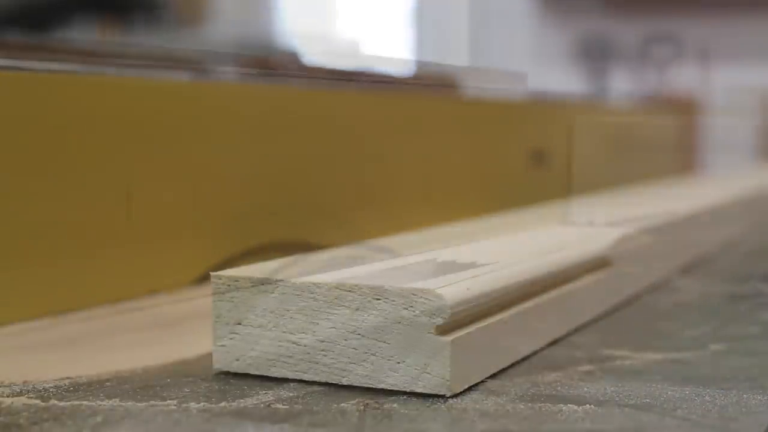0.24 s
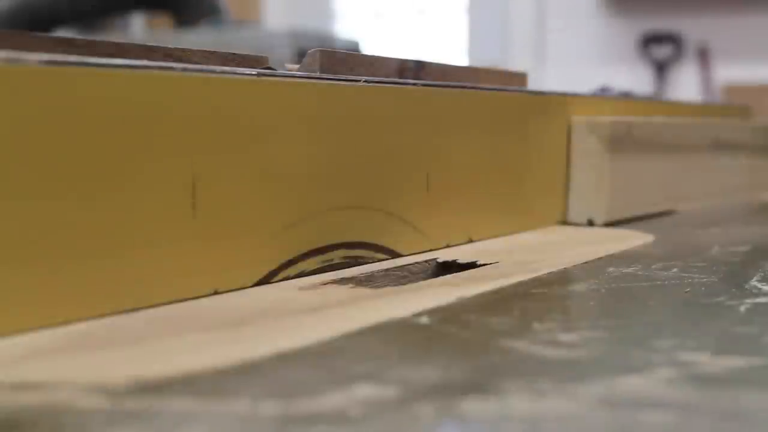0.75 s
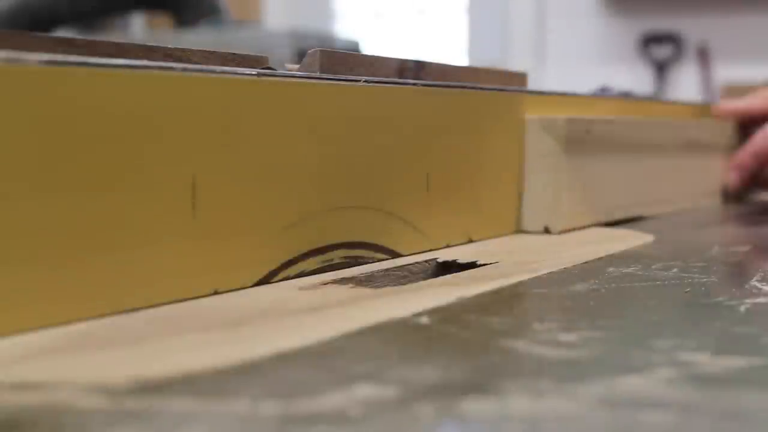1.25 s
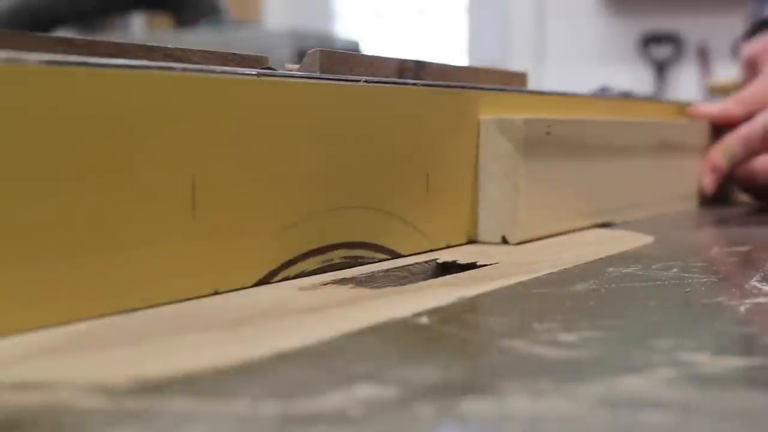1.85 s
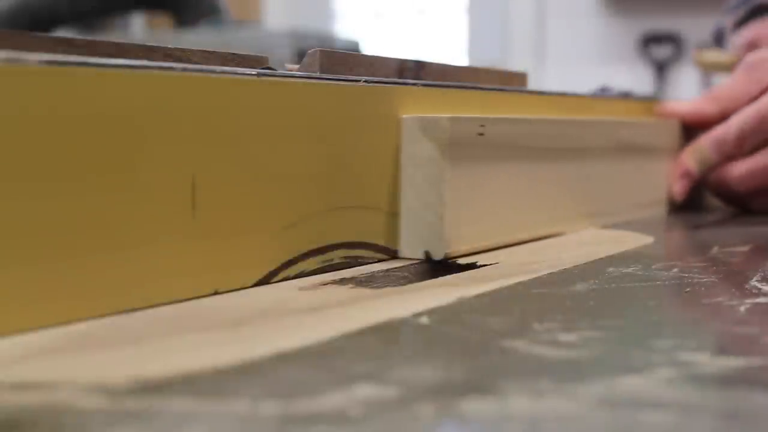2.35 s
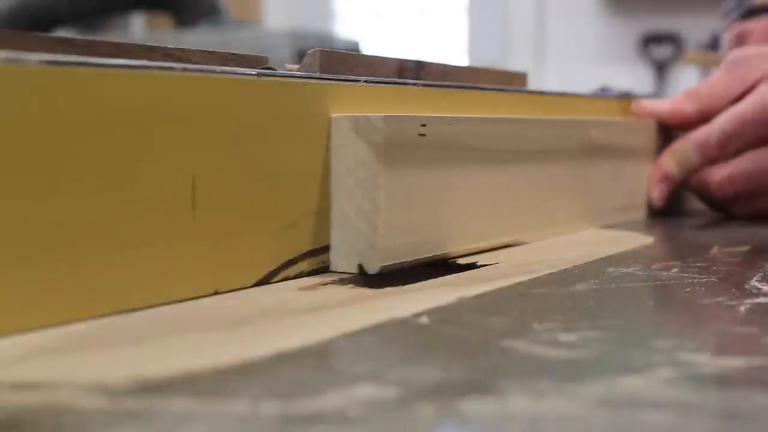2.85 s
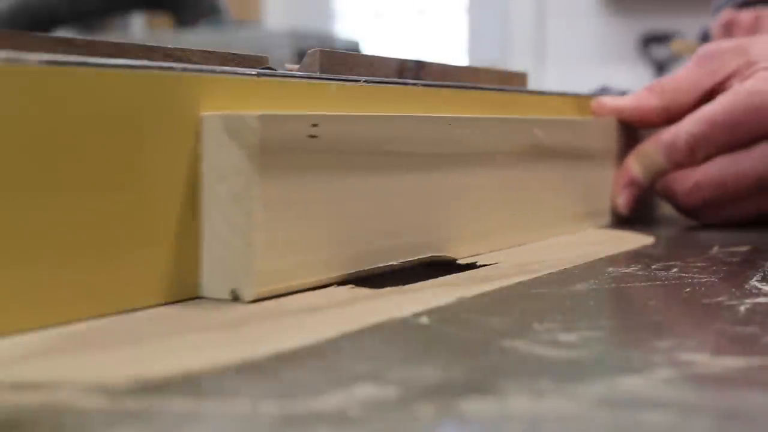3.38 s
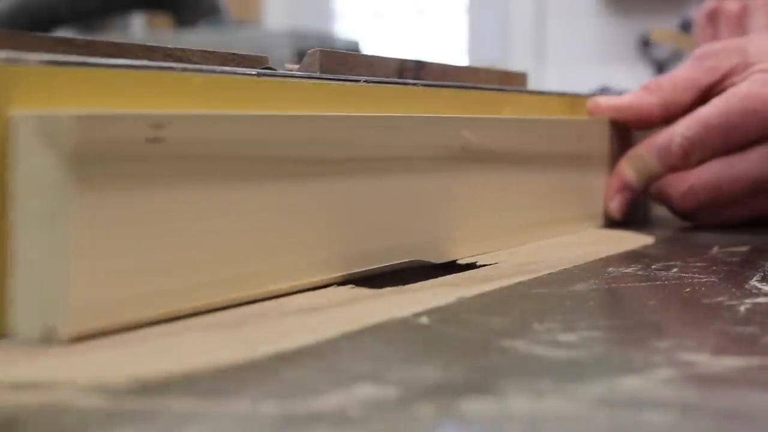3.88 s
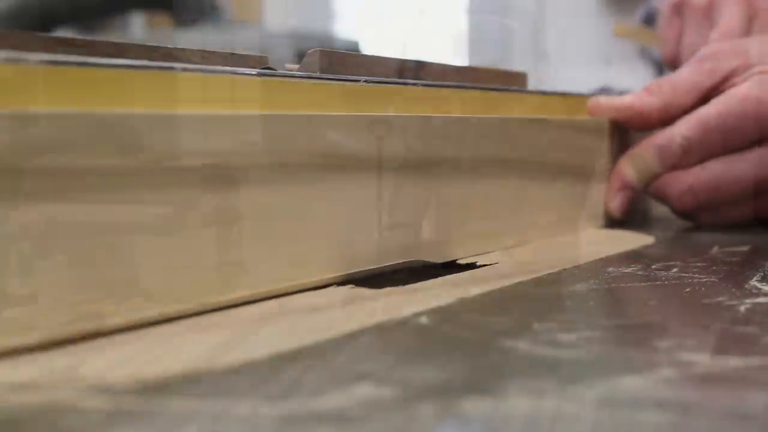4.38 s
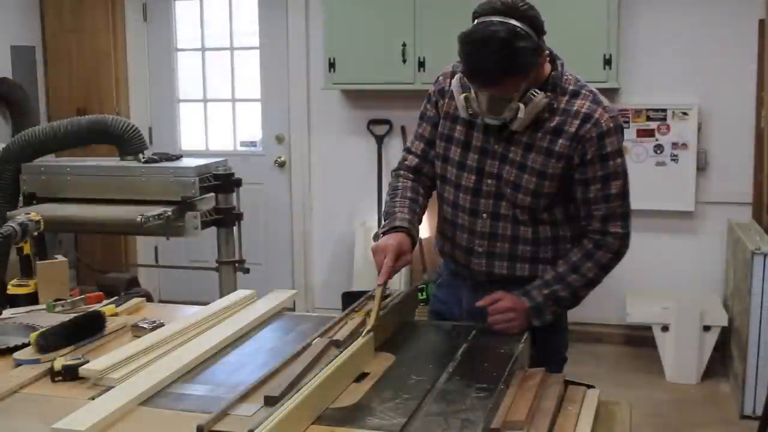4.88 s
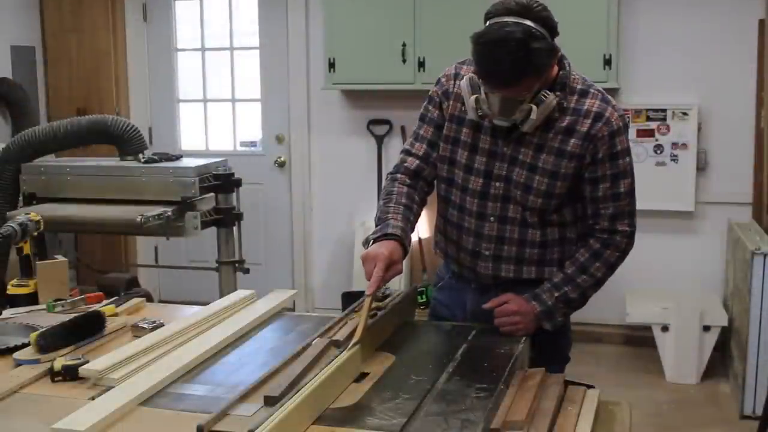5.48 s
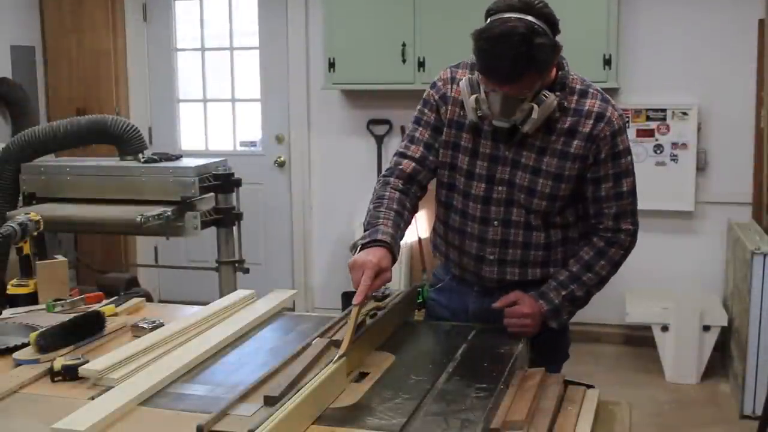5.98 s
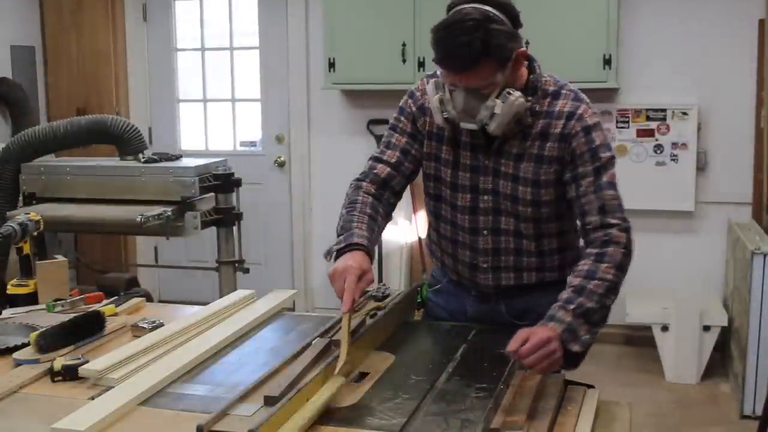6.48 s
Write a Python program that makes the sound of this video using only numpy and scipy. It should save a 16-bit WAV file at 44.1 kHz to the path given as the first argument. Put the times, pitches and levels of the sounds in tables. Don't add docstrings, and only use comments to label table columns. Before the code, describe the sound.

A table saw clacks and spins up to a harsh overloaded close drone, bites into a board, then dissolves to a more distant whine ending in a knock.

```python
import sys
import numpy as np
from scipy import signal
from scipy.fft import rfft, irfft, next_fast_len
from scipy.io import wavfile

SR = 44100
rng = np.random.default_rng(int(sys.argv[2]) if len(sys.argv) > 2 else 0)


def generate_wav(signal):
    frames = np.transpose(np.atleast_2d(signal))
    scaled = np.clip(frames, -1, 1) * 32767
    pcm = np.round(scaled).astype(np.int16)
    wavfile.write(sys.argv[1], SR, pcm)


def voltage_ratio(level):
    return 10 ** (np.asarray(level, float) / 20)


N = 296793
TIME = np.arange(N) / SR
RUN_HZ = 216.2


def evened(x):
    return x / np.sqrt(np.mean(x ** 2) + 1e-20)


def ramp(start_s, end_s):
    return np.clip((TIME - start_s) / (end_s - start_s), 0, 1)


def columns(rows):
    time_s, *values = np.transpose(rows)
    return [np.interp(TIME, time_s, value) for value in values]


def noise(colour):
    size = next_fast_len(N)
    freq_hz, level_db = np.transpose(colour)
    bins_hz = np.fft.rfftfreq(size, 1 / SR)
    gain = voltage_ratio(np.interp(np.log(bins_hz + 1), np.log(freq_hz), level_db))
    return evened(irfft(rfft(rng.standard_normal(size)) * gain, size)[:N])


def wander(rate_hz):
    size = next_fast_len(N)
    slow = np.exp(-(np.fft.rfftfreq(size, 1 / SR) / rate_hz) ** 2)
    return evened(irfft(rfft(rng.standard_normal(size)) * slow, size)[:N])


def ring(x, freq_hz, width_hz):
    radius = np.exp(-np.pi * width_hz / SR)
    turn = radius * np.cos(2 * np.pi * freq_hz / SR)
    return 2 * (1 - radius) * signal.lfilter([1, -turn], [1, -2 * turn, radius ** 2], x)


def struck(start_s, level_db, t60_s):
    after_s = TIME - start_s
    attack = np.clip(after_s / .001, 0, 1)
    return voltage_ratio(level_db - 60 * np.maximum(after_s, 0) / t60_s) * attack


def overload(x, sag=0, knee=0.014):
    ceiling, floor = .297, -.284
    top = ceiling - sag - knee * np.logaddexp(0, (ceiling - sag - x) / knee)
    return floor + knee * np.logaddexp(0, (top - floor) / knee)


# freq_hz, level_db (per Hz)
ROOM_COLOUR = [(18, -47), (30, -15), (86, -9), (124, 0), (157, -6), (328, -11), (473, -11), (721, -13),
               (1070, -13), (3670, -18.5), (16000, -42)]
# freq_hz, level_db
HUM = [(120, -67), (480, -74)]


def workshop():
    rustle_s, rustle_half_s, rustle_db = 0.14, 0.075, 4
    rustle = rustle_db * np.exp(-((TIME - rustle_s) / rustle_half_s) ** 4)
    level_db = -62.5 - 11 * TIME + rustle - 60 * ramp(.55, 0.59)
    hum = 0
    for freq_hz, hum_db in HUM:
        hum = hum + voltage_ratio(hum_db + 2.5 * wander(10)) * np.sin(2 * np.pi * freq_hz * TIME)
    return voltage_ratio(level_db) * noise(ROOM_COLOUR) + hum * (1 - ramp(.36, .55))


# time_s, level_db
SHUDDER = [(.555, -70), (.57, -51), (.582, -49), (.587, -25.5), (.62, -29.5), (.64, -20), (.7, -18),
           (.74, -24.5), (.78, -14)]
# freq_hz, level_db (per Hz)
SHUDDER_COLOUR = [(24, -57), (40, -40), (140, 9.5), (199, -2), (269, 1), (542, -5.5), (1180, -11),
                  (1480, -17.5), (3740, -24.5), (16000, -55)]
# start_s, peak_db, ring_hz, t60_s
CLACKS = [
    (0.5117, -42, 3500, 0.01),
    (0.5856, -32, 2525, 0.016),
    (0.6235, -2, 3760, 0.011),
    (0.6394, -13, 3590, 0.015),
    (0.6497, -1, 2860, 0.016),
    (0.667, -8.5, 3290, 0.034),
    (0.6734, -24, 3030, 0.02),
    (0.686, -18, 3150, 0.02),
    (0.7118, -16, 3180, 0.027),
]


def start_up():
    level_db = np.interp(TIME, *np.transpose(SHUDDER), left=-120, right=-120)
    out = voltage_ratio(level_db) * noise(SHUDDER_COLOUR)
    grit = rng.standard_normal(N)
    for start_s, peak_db, ring_hz, t60_s in CLACKS:
        clack = 0.36 * grit + 5 * ring(grit, ring_hz, 560)
        out += struck(start_s, peak_db - 6.0, t60_s) * clack
    return out


def knife_speed(load):
    full_speed_s, spin_up_hz_per_s, crawl_hz = .806, 1280, 74.2
    overshoot_hz, settle_s, sag_hz = 4, 0.0385, .3
    rising = RUN_HZ + overshoot_hz - spin_up_hz_per_s * (full_speed_s - TIME)
    rising = np.maximum(rising, crawl_hz)
    overshoot = overshoot_hz * np.exp(-((TIME - full_speed_s) / settle_s) ** 2)
    settled = RUN_HZ + overshoot - sag_hz * load
    return np.minimum(rising, settled + 1e3 * (TIME < full_speed_s))


def knife_passes(speed_hz, ahead):
    passes = np.cumsum(speed_hz) / SR
    return passes + ahead - passes[round(4.7 * SR)] % 3


# time_s, edge (0-1 as the slot narrows), bias (pressure)
COVER = [
    (.8, 0.48, -.04),
    (1.2, 0.41, 0.059),
    (2, 0.6, 0.026),
    (2.3, 0.92, -0.074),
    (2.5, 0.56, -.1),
    (3, 0.65, -0.16),
    (3.3, 0.38, -0.057),
    (3.7, 0.49, -0.035),
    (4.6, 0.47, 0.045),
]


def close_tone(speed_hz, passes, deep, edge, bias):
    level_db = -5 + 10.5 * np.log2(speed_hz / RUN_HZ) + 4 * deep
    turn = 2 * np.pi * passes
    steep = -np.cos(3 * turn) / 3 + np.cos(5 * turn) / 5
    uneven = 0.037 * np.cos(2 / 3 * turn) + 0.021 * np.cos(4 / 3 * turn + 0.23)
    lean = -0.16 * np.sin(2 * turn)
    tone = np.cos(turn) + edge * steep + lean + bias + uneven
    return np.sqrt(2) * voltage_ratio(level_db) * tone


# freq_hz, level_db
CLOSE_AIR = [(30, -17.5), (130, 12.5), (320, 2.5), (800, 1), (2000, -8.5), (4000, -23.5), (8000, -20),
             (16000, -45)]


def close_rush(speed_hz, deep):
    level_db = -19 + 11 * np.log2(speed_hz / RUN_HZ) + 4 * deep
    return voltage_ratio(level_db + 0.5 * wander(33)) * noise(CLOSE_AIR)


def slot_flutter(passes, edge):
    hiss = evened(ring(rng.standard_normal(N), 2780, 860))
    return 0.087 * edge ** 2 * hiss * (1 - np.cos(2 * np.pi * passes))


KNIVES_DB = [0, -15, -18]


def knife_sizes(passes, spread_db):
    count = passes.astype(int)
    chance = np.clip(rng.standard_normal(4000), -2, 2)
    return voltage_ratio(np.take(KNIVES_DB, count % 3) + spread_db * chance[count])


def bursts(passes, colour, length, spread_db):
    shape = np.exp(-((passes % 1 - .5) / length) ** 2)
    return evened(knife_sizes(passes, spread_db) * shape) * noise(colour)


def wood(passes, modes, scraping):
    struck_now = np.diff(np.floor(passes), prepend=np.floor(passes[0]))
    blows = struck_now * knife_sizes(passes, spread_db=1.5)
    drive = evened(blows) + scraping * rng.standard_normal(N)
    out = 0
    for freq_hz, width_hz, level_db in modes:
        mode = ring(ring(drive, freq_hz, width_hz), freq_hz, width_hz)
        out = out + voltage_ratio(level_db) * evened(mode)
    return evened(out)


# start_s, shock_db, shock_fade_s, steady_db
CONTACTS = [
    (2.56, -37, .2, -49),
    (3.66, -31, 0.051, -29),
    (4.46, -22, 0.37, -32),
]


def bite_size(deep):
    size = voltage_ratio(-43.5) * np.ones(N)
    for start_s, shock_db, fade_s, steady_db in CONTACTS:
        shock = voltage_ratio(shock_db) * np.exp(-abs(TIME - start_s) / fade_s)
        size += ramp(start_s, start_s + 0.024) * (shock + voltage_ratio(steady_db))
    return size * voltage_ratio(3 * deep + 1.2 * wander(25))


# freq_hz, level_db
BITE = [(300, -22), (1500, -24.5), (3500, 5.5), (6000, -10), (9000, -2), (11000, -4), (13000, -3),
        (16000, -4)]
# freq_hz, width_hz, level_db
EDGE_RING = [(3500, 600, 0), (1100, 400, -11), (600, 200, -15)]
# freq_hz, width_hz, level_db
THUD = [(584, 170, 0.31), (830, 105, -3.4), (1180, 420, -0.21)]


def close_bites(passes, deep):
    splinters = bursts(passes + .27, BITE, length=.15, spread_db=2)
    slip = .022 * wander(120)
    edge_ring = wood(passes - .13 + slip, EDGE_RING, scraping=.12)
    thud = voltage_ratio(-16.5) * deep * wood(passes - .13, THUD, scraping=.1)
    return bite_size(deep) * (.6 * splinters + 1.5 * edge_ring) + thud


def close_view():
    speed_hz = knife_speed(ramp(3.66, 3.75))
    deep = ramp(3.95, 4.57)
    edge, bias = columns(COVER)
    passes = knife_passes(speed_hz, ahead=3)
    saw = close_tone(speed_hz, passes, deep, edge, bias) + close_rush(speed_hz, deep)
    saw = saw + slot_flutter(passes, edge) + close_bites(passes, deep)
    pressure = ramp(.66, .739) * saw + start_up() + workshop()
    letting_go = np.clip(passes % 1 - .13, 0, .2) * (passes % 1 < .5)
    return overload(pressure, sag=.75 * letting_go * ramp(.73, .78))


def run_out():
    leave_s, release_s, short_s = 5.78, .08, 0.33
    cutting = 1 - ramp(leave_s - release_s / 2, leave_s + release_s / 2)
    short = np.exp(-np.maximum(leave_s - release_s - TIME, 0) / short_s)
    return cutting, short, np.maximum(TIME - leave_s, 0)


def orders(table, turn, lag):
    multiple, level_db = np.transpose(table)
    twin = np.sign(np.cos(np.pi * .145 * multiple))
    scatter = .12 * rng.standard_normal(len(multiple))
    phase = (multiple - 1) * (np.pi - lag + scatter)
    out = 0
    for k, sign, db, shift in zip(multiple, twin, level_db, phase):
        out = out + sign * voltage_ratio(db + 0.91 * wander(9.2)) * np.cos(k * turn + shift)
    return out


# multiple, level_db
LOADED = [(1, 3), (2, -3.5), (3, -13), (4, -5.5), (5, -16), (6, -10), (7, -61), (8, -14), (9, -19),
          (10, -15), (11, -22), (12, -17)]
# multiple, level_db
FREE = [(1, 2.5), (2, -7), (3, -10), (4, -12), (5, -22), (6, -13), (7, -11), (8, -21), (9, -21.5),
        (10, -18), (11, -32.5), (12, -48), (13, -25.5), (14, -26.5), (15, -21.5), (16, -55), (17, -43),
        (18, -44), (19, -34), (20, -46), (21, -58), (22, -55), (23, -56), (24, -51)]


def far_tone(passes, cutting, short, since_s):
    free_load, cut_load, end_load = 0.066, 0.63, 1
    load = free_load + cutting * (cut_load + (end_load - cut_load) * short - free_load)
    load = np.clip(load, 0, 1)
    level_db = -23 + 3.5 * short + 1.5 * since_s
    turn = 2 * np.pi * passes
    tone = load * orders(LOADED, turn, lag=.33) + (1 - load) * orders(FREE, turn, lag=.12)
    unbalance = (0.11 + 0.094 * load) * voltage_ratio(wander(3.6)) * np.cos(2 / 3 * turn)
    return np.sqrt(2) * voltage_ratio(level_db) * (tone + unbalance)


# freq_hz, width_hz, level_db
BOARD = [(572, 26, -1), (756, 170, -5), (931, 69, 2), (1135, 150, 3), (1367, 134, 0.5), (1940, 2300, 1),
         (2920, 780, 4.5), (3700, 200, 3), (5900, 4300, -9), (7550, 4600, -8)]
# freq_hz, width_hz, level_db
FREE_END = [(1220, 560, -0.5), (2340, 420, -6), (3495, 270, -4), (4010, 530, -7), (4900, 2100, -8.5)]


def far_board(passes, short, since_s):
    board_db = -29 + 5.5 * short - 60 * since_s / 0.29
    end_db = -35 + 14 * short - 60 * since_s / .28
    board = voltage_ratio(board_db) * wood(passes - .2, BOARD, scraping=.25)
    return board + voltage_ratio(end_db) * wood(passes - .2, FREE_END, scraping=.3)


# freq_hz, level_db
CHIPS = [(1000, -20), (3800, 7), (6000, -5), (9000, -15.5), (11000, -12), (13000, -3.5), (16000, -14)]


def flying_chips(passes):
    outside_s = np.maximum(4.95 - TIME, 0) + np.maximum(TIME - 6, 0)
    level_db = np.maximum(-39 - 84 * outside_s, -60)
    return voltage_ratio(level_db) * bursts(passes + .15, CHIPS, length=.12, spread_db=3.5)


# freq_hz, level_db (per Hz)
FAR_AIR = [(20, -36), (60, -11), (140, 1.5), (240, -8.5), (330, 5.5), (430, -0.5), (520, -4), (1000, -2),
           (2000, -10.5), (3500, -12), (5000, -21.5), (8000, -29.5), (16000, -37.5)]


def blower_air():
    return voltage_ratio(-29.5 + wander(20)) * noise(FAR_AIR)


# start_s, level_db (before the overload), t60_s
KNOCK = [
    (6.701, -4, 0.095),
    (6.718, -22, 0.044),
]
# freq_hz, level_db (per Hz)
KNOCK_COLOUR = [(59, -60), (100, -13), (244, -0.5), (768, -13), (2800, -12), (3320, -12.5), (3860, -21),
                (16000, -75.5)]


def final_knock():
    return sum(struck(*row) for row in KNOCK) * noise(KNOCK_COLOUR)


def far_view():
    cutting, short, since_s = run_out()
    passes = knife_passes(knife_speed(cutting), ahead=3.3)
    saw = far_tone(passes, cutting, short, since_s) + far_board(passes, short, since_s)
    return overload(saw + flying_chips(passes) + blower_air() + final_knock())


def scene():
    far = ramp(4.46, 4.83)
    return ((1 - far) * close_view() + far * far_view())[None]


def band_limit(x):
    return signal.sosfilt(signal.butter(12, 16500, fs=SR, output="sos"), x)


def record(dry):
    low_pass = signal.firwin(511, 15850, window=("kaiser", 9), fs=SR)
    limited = signal.oaconvolve(dry, low_pass[None], "same")
    return band_limit(limited)


dry = scene()
out = record(dry)
generate_wav(out)
```